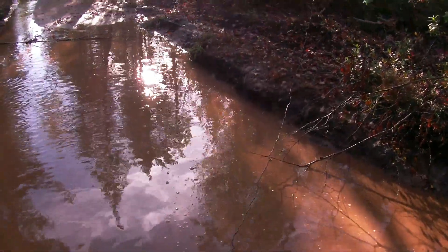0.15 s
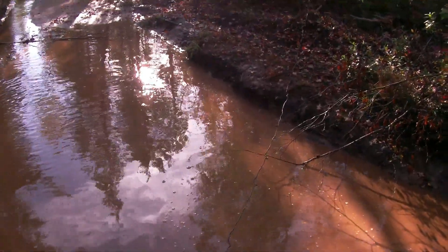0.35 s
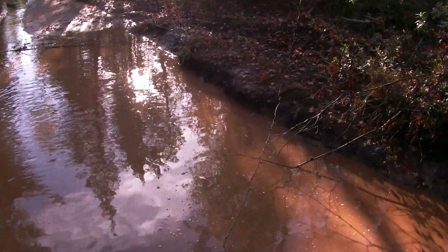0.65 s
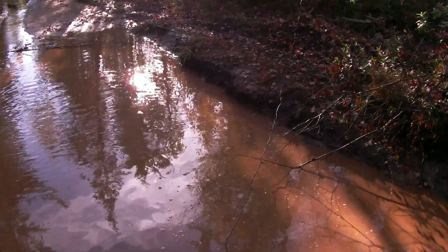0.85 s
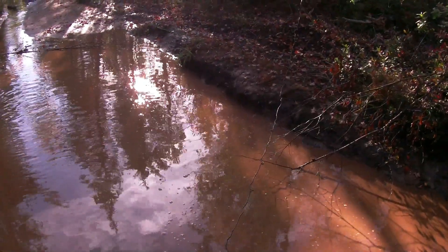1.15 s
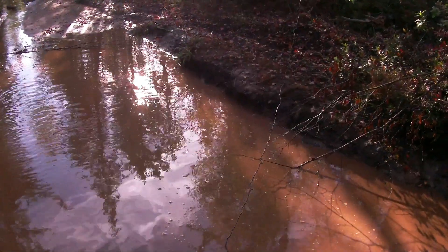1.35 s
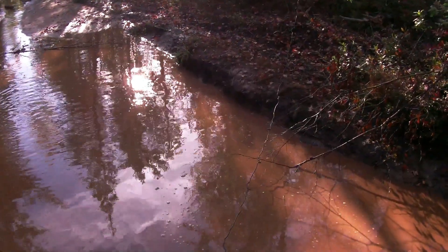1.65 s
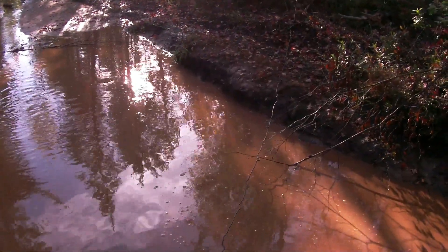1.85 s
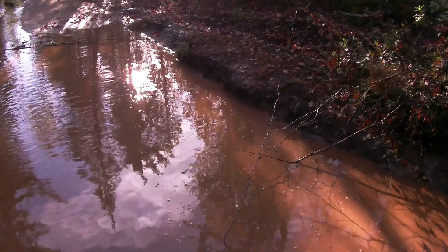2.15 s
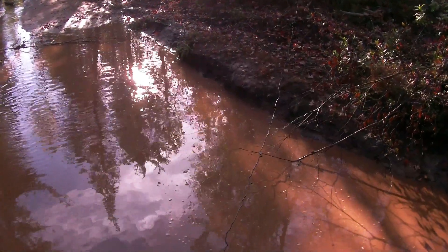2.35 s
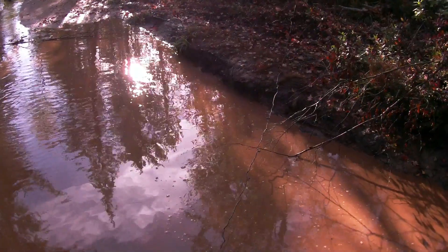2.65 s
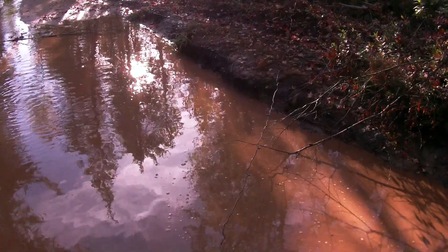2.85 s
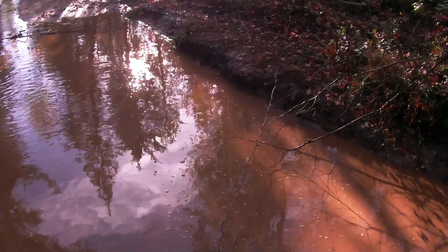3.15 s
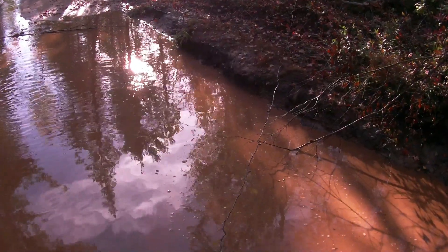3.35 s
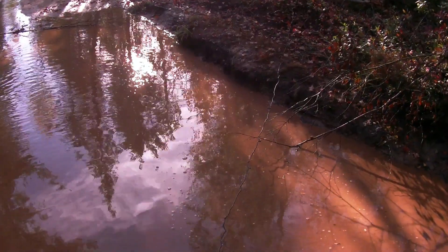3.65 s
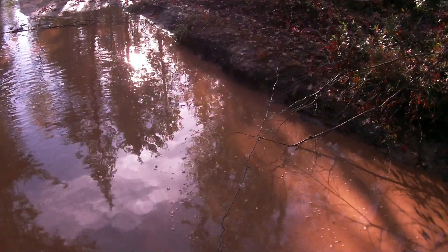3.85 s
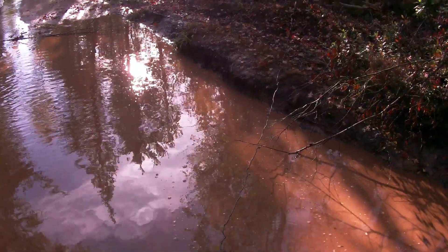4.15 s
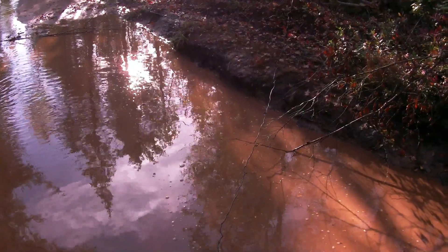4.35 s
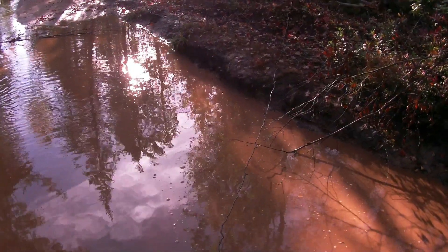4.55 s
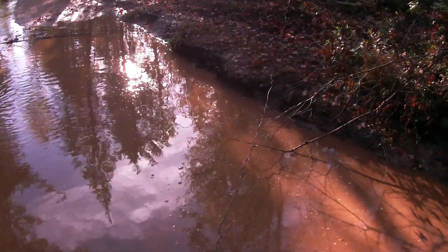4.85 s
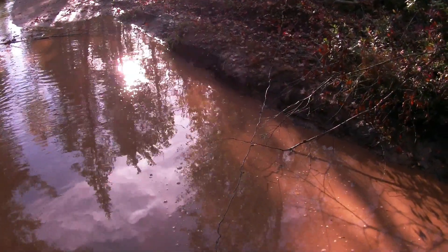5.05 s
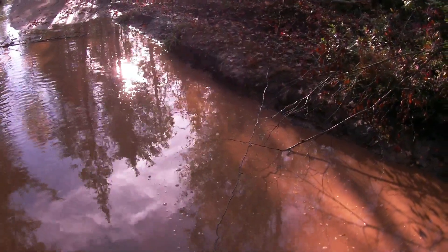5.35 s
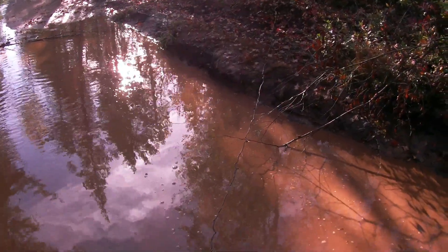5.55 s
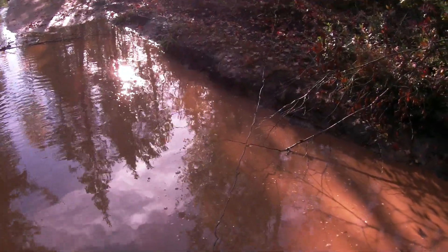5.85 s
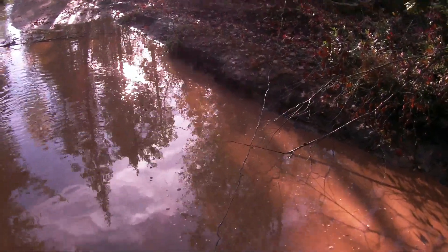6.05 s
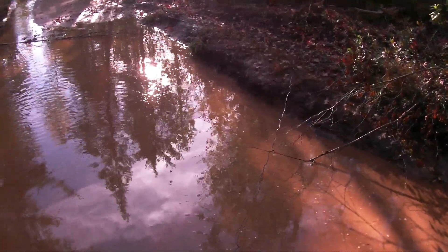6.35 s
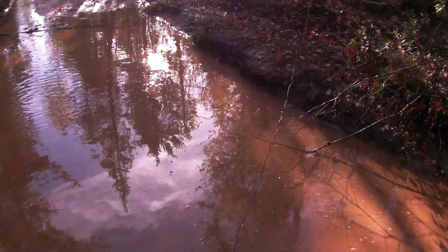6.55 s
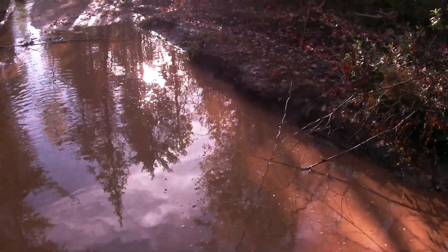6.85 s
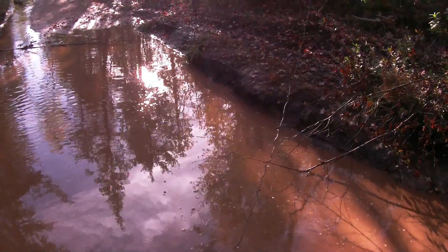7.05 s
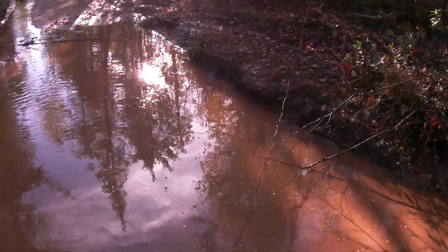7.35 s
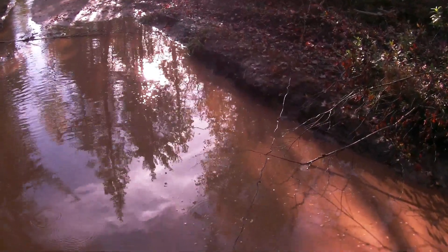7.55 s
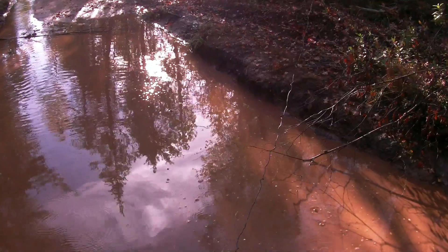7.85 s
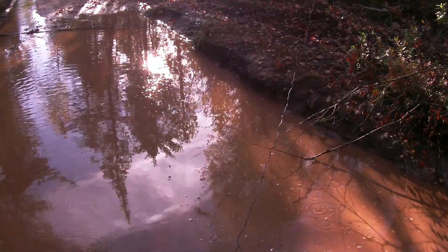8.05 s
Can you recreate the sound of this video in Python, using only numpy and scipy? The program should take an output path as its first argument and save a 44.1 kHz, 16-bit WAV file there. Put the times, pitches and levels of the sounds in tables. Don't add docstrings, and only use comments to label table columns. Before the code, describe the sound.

A small single-cylinder four-stroke engine idles close by, deep separate thumps about eleven a second, slightly hunting, with ticking valves and light clatter. Near five seconds the throttle opens: dull knocks, a hoarse intake honk, speed doubling. It holds briefly, then surges again to a fast growl with a thin whine near the end. Outdoors, dry, small dull microphone with rounded peaks.

```python
import sys
import numpy as np
from scipy import signal
from scipy.fft import rfft, irfft
from scipy.io import wavfile
from scipy.ndimage import uniform_filter1d

SR = 44100
rng = np.random.default_rng(int(sys.argv[2]) if len(sys.argv) > 2 else 0)


def wav_out(sig):
    wavfile.write(sys.argv[1], SR, np.round(np.clip(np.atleast_2d(sig).T, -1, 1) * 32767).astype(np.int16))


def invert_db(level):
    return 10 ** (np.asarray(level, dtype=float) / 20)


N = 361179

# t/s, firing rate/Hz
THROTTLE_SPEED = [(4.872, 11.912), (5.137, 15.674), (5.351, 22.172), (5.453, 23.711), (5.673, 23.61),
                  (6.073, 22.011), (6.404, 23.105), (6.572, 26.181), (6.746, 28.569), (6.95, 30.411),
                  (7.31, 31.648), (7.541, 31.393), (7.77, 32.208), (8.19, 32.158)]
# t/s, firing rate lost/Hz
STUMBLES = [(0.1, 1.431), (0.65, 0.726), (1.58, 0.377), (1.77, 0.452), (2.59, 0.454), (2.78, 0.118),
            (3.23, 0.325), (3.42, 0.304), (3.7, 0.449), (4.43, 0.604), (4.71, 0.363)]
# t/s, level/dB
FEEBLE = [(.21, -2.5), (.67, -3.5), (.86, -2.5), (1.598, -7), (2.8, -3), (3.44, 0.5), (3.72, 2), (4.0, 0.5),
          (4.45, 0), (4.83, -1.5)]
# t/s, effort/0-1
EFFORT = [(0.0, 0.03), (.7, 0.28), (3.0, 0.22), (3.45, 0), (4.3, 0), (4.9, 0.2), (5.15, 0.2), (5.36, 0.73),
          (5.59, 0.83), (6.14, 0.47), (6.41, 0.93), (6.75, 1.), (7.34, 1), (7.91, 0.25), (8.19, 0.6)]
STATES = [11, 15.5, 22, 27, 31.5]

# f/Hz, level/dB
RUMBLE = [(15, -30), (28, -3), (45, 0), (65, -15), (120, -62)]
# f/Hz, level/dB
HISS = [(1120, -49), (1900, -55), (2260, -15), (2920, -13.5), (3580, -1.5), (4340, 1), (5060, -4.5),
        (5400, -5.5), (6200, -15), (8060, -67), (13600, -120)]
# t/s, f/Hz, level/dB
WHINE = [
    (7.15, 1170, -58),
    (7.3, 1205, -40),
    (7.5, 1235, -42),
    (7.7, 1290, -39),
    (7.85, 1345, -40),
    (8.0, 1380, -43),
    (8.15, 1400, -55),
]
# t/s, peak level/dB, f/Hz
KNOCKS = [
    (5.046, -29, 1036),
    (5.121, -21, 716),
    (5.184, -18.5, 605),
    (5.241, -14.5, 450),
    (5.389, -29, 935),
    (5.477, -17, 410),
    (5.564, -23, 696),
    (6.656, -40, 477),
    (6.728, -20, 425),
    (6.833, -30, 550),
]
# f/Hz, t60/s, level over the clatter/dB, phase/cycles
TICKS = [
    (700, 0.057, -5, 0.5),
    (958, 0.12, -7.5, .85),
    (1326, 0.091, -19, .85),
    (964, 0.03, -11.5, .32),
]
# f/Hz, level/dB
RATTLE = [(180, -39.5), (300, 4.5), (350, -8.5), (408, -3), (507, -19), (695, -3.5), (782, -5), (954, -3.5),
          (1050, -6), (1480, -10.5), (1960, -28.5), (2600, -34), (3380, -67), (5720, -120)]
# f/Hz, width/Hz, idle level/dB, full load level/dB, knock phase/cycles
CASE = [(124, 38, 9, 3, 0.15), (254, 50, -3, -7, 0.342), (417.6, 27, -5.5, -4, 0.82),
        (512, 160, -12, -2.5, 0.72), (618, 26, -16, 2.5, 0.713), (702, 43, -1, -13, 0.885),
        (903, 210, -4, -5.5, 0.99), (953, 170, -2.5, -24, 0.81), (1283, 154, -7, -15.5, 0.87),
        (1503, 26, -13, -16, 0.92)]

# f/Hz, t60/s
PIPE = [(37, .085), (60, .06), (77, .075), (101, .2), (112, .101), (144, .065), (195, .04), (246, .03),
        (287, .03), (328, .04), (375, .04), (445, .05), (500, .07), (611, .12)]
VALVE_PHASES = [-.012, .12, .25]
EXHAUST_OPENS = [(-0.059, -0.028, -0.074, -0.061, -0.046), (-0.173, -0.069, -0.181, -0.112, -0.066),
                 (-0.123, -0.248, -0.069, -0.118, 0.044), (0.088, -0.199, 0.001, -0.082, -0.017),
                 (-0.015, 0.244, -0.113, -0.005, 0.292), (0.019, -0.056, 0.029, 0.198, 0.011),
                 (0.033, 0.005, -0.003, -0.142, 0.127), (0.033, 0.082, -0.049, 0.447, 0.079),
                 (-0.015, 0.086, 0.069, -0.084, -0.163), (0.007, -0.055, 0.089, -0.076, -0.058),
                 (0.001, 0.029, -0.029, 0.042, 0.057), (0.005, -0.009, 0.017, 0.071, -0.042),
                 (0.004, 0.012, 0.01, -0.041, 0.039), (0.001, 0.01, 0.006, 0.029, -0.023)]
EXHAUST_ECHOES = [(-0.098, -0.198, -0.129, 0.15, 0.008), (0.004, 0.0, 0.096, -0.072, -0.077),
                  (-0.033, 0.033, -0.036, -0.083, 0.002), (-0.075, 0.139, -0.009, 0.019, 0.085),
                  (0.141, 0.182, 0.235, 0.124, -0.142), (-0.002, -0.048, 0.184, 0.062, -0.044),
                  (-0.009, -0.109, -0.046, -0.118, 0.022), (0.049, 0.084, -0.174, -0.211, 0.058),
                  (-0.046, -0.035, 0.156, 0.368, -0.24), (0.012, 0.033, -0.045, -0.444, 0.136),
                  (-0.003, 0.012, -0.101, 0.171, 0.107), (-0.001, 0.005, -0.035, 0.101, -0.063),
                  (-0.0, -0.018, 0.066, -0.026, -0.062), (-0.001, -0.004, 0.019, -0.095, -0.015)]
EXHAUST_SHUTS = [(-0.093, -0.104, 0.007, -0.088, -0.082), (-0.011, 0.09, 0.061, -0.21, -0.031),
                 (-0.082, -0.039, -0.031, 0.014, -0.164), (-0.069, -0.049, 0.077, -0.082, -0.171),
                 (0.086, -0.025, -0.339, -0.259, 0.018), (-0.04, 0.03, -0.043, 0.128, 0.201),
                 (-0.014, -0.02, -0.0, 0.083, 0.027), (-0.059, -0.001, 0.012, -0.122, 0.182),
                 (0.072, 0.029, -0.004, 0.245, 0.201), (-0.027, -0.028, -0.091, -0.053, -0.187),
                 (-0.005, -0.029, -0.007, -0.02, 0.035), (-0.001, -0.029, 0.023, -0.014, 0.001),
                 (-0.003, 0.0, -0.032, 0.021, 0.021), (-0.003, 0.001, -0.004, 0.052, -0.032)]

# idle level/dB, added at full speed/dB, added at full effort/dB
HISS_DB = (-53.5, 7, -2)
CLATTER_DB = (-34.5, 12.5, -1.5)
EXHAUST_DB = (0.39, -0.5, 1.2)
INTAKE_DB = (-29.5, -2.7, 24.5)

FIRST_PHASE = .831
RECOVER_S, FEEBLE_S = 1.2, 0.018
RUMBLE_DB = -44
HUNT_DB = 1.7
SOFT_S = 0.0015
HOLD_HZ = 12000
GRIT_DB, GRIT_HZ = -40, 8650


def rms_one(x):
    return x / np.sqrt(np.mean(x ** 2) + 1e-20)


def in_time(rows):
    s, *columns = np.transpose(rows)
    return [np.interp(np.arange(N) / SR, s, column) for column in columns]


def evened(x, span_s):
    span = int(span_s * SR)
    power = uniform_filter1d(uniform_filter1d(x ** 2, span), span)
    return x / np.sqrt(power + 1e-12)


def drift(rate):
    points = rng.standard_normal(2000)
    return np.interp(np.arange(N) * rate / SR, np.arange(2000), points)


def ring(clicks, hz, t60):
    r = invert_db(-60 / (t60 * SR))
    w = 2 * np.pi * hz / SR
    return signal.lfilter([0, np.sin(w)], [1, -2 * r * np.cos(w), r * r], clicks + 1e-18)


def coloured(spectrum):
    hz, level_db = np.transpose(spectrum)
    grid = np.arange(N // 2 + 1) * SR / N + 1
    gain = invert_db(np.interp(np.log(grid), np.log(hz), level_db))
    return rms_one(irfft(rfft(rng.standard_normal(N)) * gain, N))


def crank_speed():
    t = np.arange(N) / SR
    speed = in_time(THROTTLE_SPEED)[0]
    for s, lost in STUMBLES:
        speed = speed - lost * (t > s) * np.exp(-np.maximum(t - s, 0) / RECOVER_S)
    return speed


def rumble(load):
    return invert_db(RUMBLE_DB + 2.1 * load) * coloured(RUMBLE)


def hiss(cycle, level_db):
    pulse_db = 0.29 * np.cos(2 * np.pi * (cycle - .85))
    return invert_db(level_db + 0.85 * drift(30) + pulse_db) * coloured(HISS)


def whine():
    hz, level_db = in_time(WHINE)
    phase = 2 * np.pi * np.cumsum(hz + 5 * drift(30)) / SR
    return invert_db(level_db + 5.5 + 1.2 * drift(25)) * np.sin(phase)


def knocks(t60):
    out = np.zeros(N)
    for s, peak_db, hz in KNOCKS:
        burst, start = np.zeros(N), int(s * SR)
        burst[start:start + 220] = np.hanning(220) * rng.standard_normal(220) * invert_db(peak_db - 17)
        out += ring(burst, hz, t60) + 0.22 * ring(burst, hz * 1.68, t60)
    return signal.sosfilt(signal.butter(4, 1500, fs=SR, output="sos"), out)


def intake(cycle, phase, sharp, hz, t60, rough):
    turn = 2 * np.pi * (cycle - phase)
    gulp = np.exp(sharp * (np.cos(2 * turn) - 1)) * (1 + np.cos(turn)) * invert_db(2.3 * drift(40))
    push = gulp * (1 + rough * rng.standard_normal(N))
    return evened(ring(ring(push, hz, t60), hz, t60), 0.38)


def tappets(cycle):
    out = np.zeros(N)
    for hz, t60, level_db, phase in TICKS:
        loose_cycle = cycle - phase + .006 * drift(12)
        at = np.flatnonzero(np.diff(np.floor(loose_cycle)) > 0)
        clicks = np.zeros(N)
        clicks[at] = invert_db(level_db + 3.5 * rng.standard_normal(300)[:len(at)])
        soft_blow = ring(clicks, hz, 0.0065) * hz / 9000
        out += ring(soft_blow, hz, t60)
    return out


def clatter(cycle, load, knock_db, second_db, sharp, broad_db):
    out = invert_db(broad_db + 2.3 * drift(40)) * coloured(RATTLE)
    for hz, width, idle_db, full_db, phase in CASE:
        turn = 2 * np.pi * (cycle - phase)
        main = np.exp(sharp * (np.cos(turn) - 1))
        second = np.exp(sharp * (-np.cos(turn) - 1))
        swell = 1 + invert_db(knock_db + 1.3 * drift(13)) * (main + invert_db(second_db) * second)
        force = swell * rng.standard_normal(N)
        tone = rms_one(ring(force, hz, np.log(1000) / (np.pi * width)))
        out += invert_db(idle_db + (full_db - idle_db) * load / 2) * tone
    return evened(out, 0.12)


def feeble_db(t):
    return sum(level_db * np.exp(-((t - s) / FEEBLE_S) ** 2) for s, level_db in FEEBLE)


def exhaust(cycle, speed, uneven_db, mode_db, rasp_db):
    firing, spread = rng.standard_normal((200, 1)), rng.standard_normal((200, 20))
    clicks = np.zeros((len(PIPE), N))
    for kicks, phase in zip((EXHAUST_OPENS, EXHAUST_ECHOES, EXHAUST_SHUTS), VALVE_PHASES):
        at = np.flatnonzero(np.diff(np.floor(cycle - phase)))
        count = np.round(cycle[at] - phase).astype(int)
        for k, ((hz, t60), kick) in enumerate(zip(PIPE, kicks)):
            high = np.clip(hz / 150 - 2, 0, 1)
            chance_db = uneven_db * firing[count, 0] + high * (rasp_db + mode_db * spread[count, k])
            strength = invert_db(chance_db + feeble_db(at / SR))
            clicks[k, at] = np.interp(speed[at], STATES, kick) * strength
    clicks[:6] = uniform_filter1d(clicks[:6], int(SOFT_S * SR), axis=1)
    out = sum(ring(row, hz, t60) for row, (hz, t60) in zip(clicks, PIPE))
    out += 0.68 * signal.lfilter(*signal.iirpeak(205, 3.0, fs=SR), out)
    return signal.sosfilt(signal.butter(2, 22, "high", fs=SR, output="sos"), out)


def scene():
    speed = crank_speed()
    cycle = FIRST_PHASE + np.cumsum(speed) / SR
    load = np.interp(speed, [11, 32], [0, 2])
    effort = in_time(EFFORT)[0]

    def layer_db(levels):
        idle, fast, hard = levels
        return idle + fast * load / 2 + hard * effort

    clatter_db = layer_db(CLATTER_DB)
    exhaust_db = layer_db(EXHAUST_DB) + HUNT_DB * np.minimum(speed - 11.0, 0)
    growl_db = 5.5 * np.exp(-((speed - 21) / 6) ** 2)
    intake_db = clatter_db + layer_db(INTAKE_DB) + growl_db

    mix = rumble(load) + hiss(cycle, layer_db(HISS_DB)) + whine() + knocks(t60=0.026)
    mix += invert_db(intake_db) * intake(cycle, phase=.6, sharp=59.0, hz=511, t60=0.017, rough=1.0)
    mix += invert_db(clatter_db - 2.9 * load) * tappets(cycle)
    mix += invert_db(clatter_db) * clatter(cycle, load, knock_db=3.5, second_db=-15.0, sharp=18.0, broad_db=2.0)
    mix += invert_db(exhaust_db) * exhaust(cycle, speed, uneven_db=0.1, mode_db=1.8, rasp_db=0.5)
    return mix[None]


def roll_off(x):
    return signal.sosfilt(signal.butter(12, 15800, fs=SR, output="sos"), x)


def record(dry):
    dry = 0.76 * np.tanh(dry / 0.81)
    upper = signal.sosfilt(signal.butter(4, 85, "high", fs=SR, output="sos"), dry)
    mirrored = dry + 2 * upper * np.cos(2 * np.pi * HOLD_HZ * np.arange(N) / SR)
    hold_gain = np.sinc(np.arange(N // 2 + 1) * SR / N / HOLD_HZ)
    held = irfft(rfft(mirrored) * hold_gain, N)
    grit = signal.sosfilt(signal.butter(4, GRIT_HZ, "high", fs=SR, output="sos"), rng.standard_normal(N))
    slow_level = np.sqrt(uniform_filter1d(dry ** 2, int(0.028 * SR)))
    held += invert_db(GRIT_DB) * slow_level * grit
    return roll_off(held)


dry = scene()
out = record(dry)
wav_out(out)
```